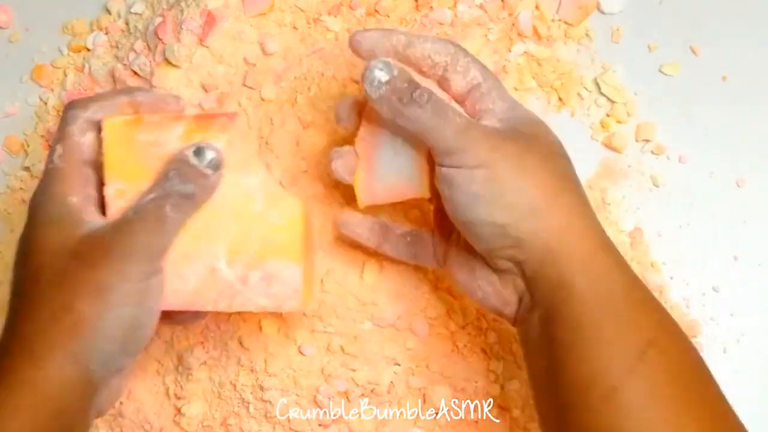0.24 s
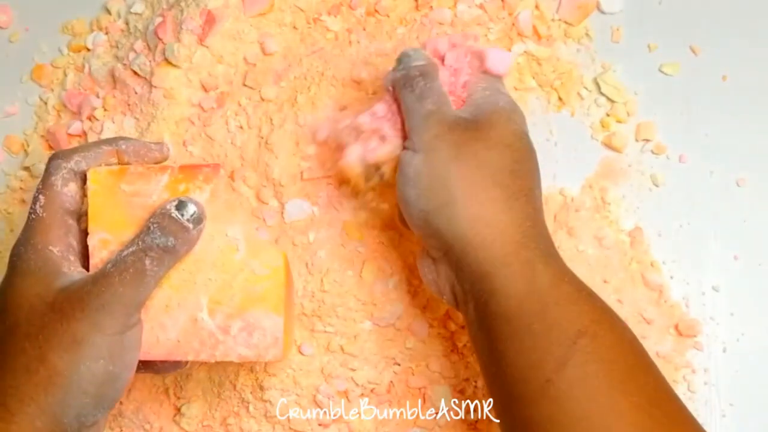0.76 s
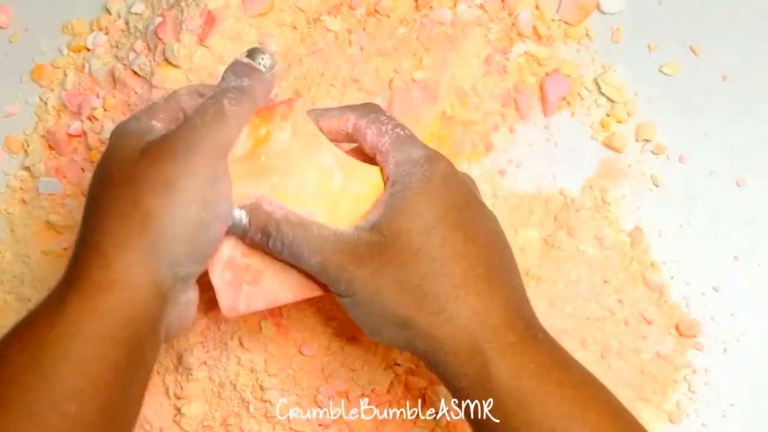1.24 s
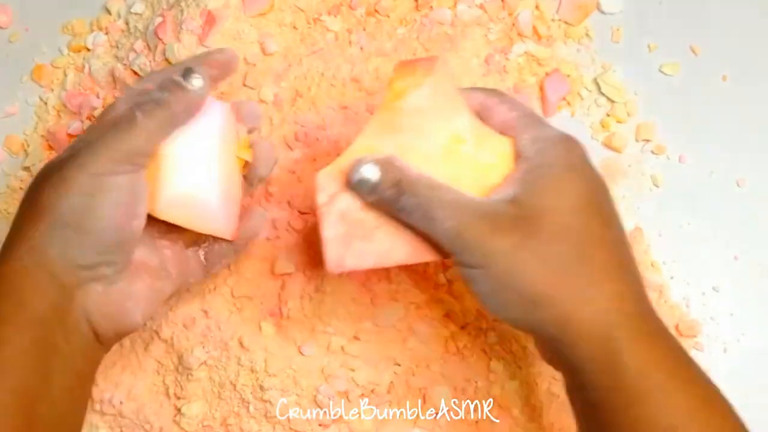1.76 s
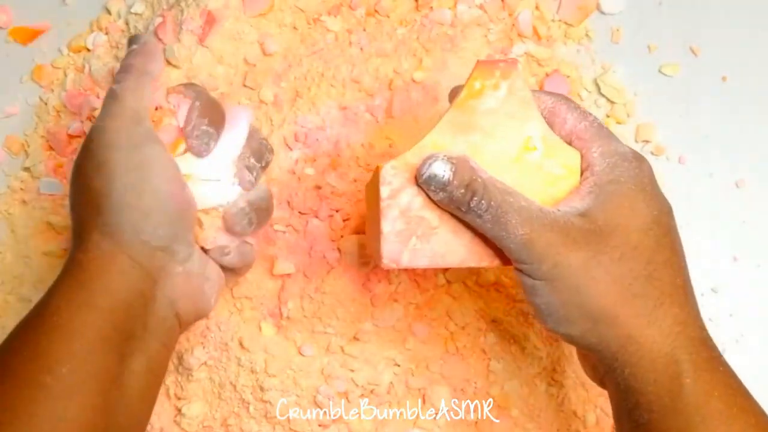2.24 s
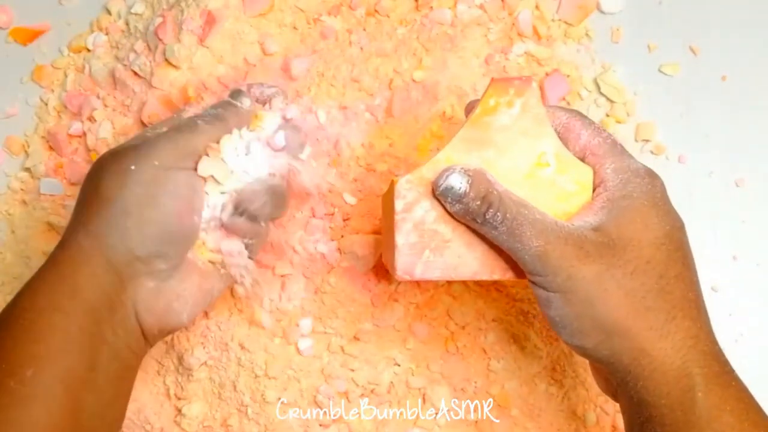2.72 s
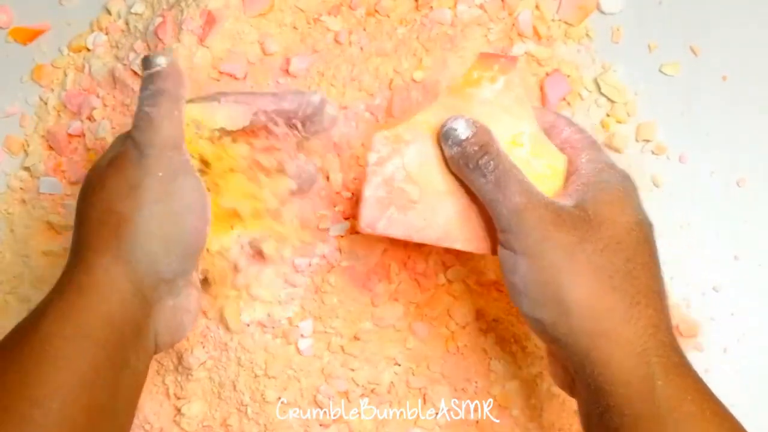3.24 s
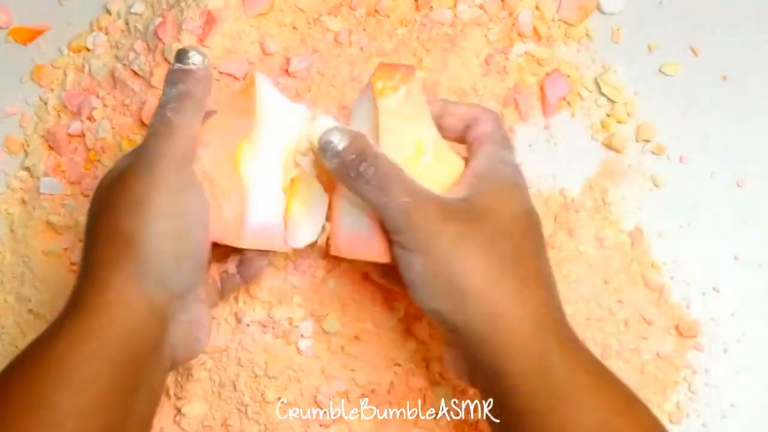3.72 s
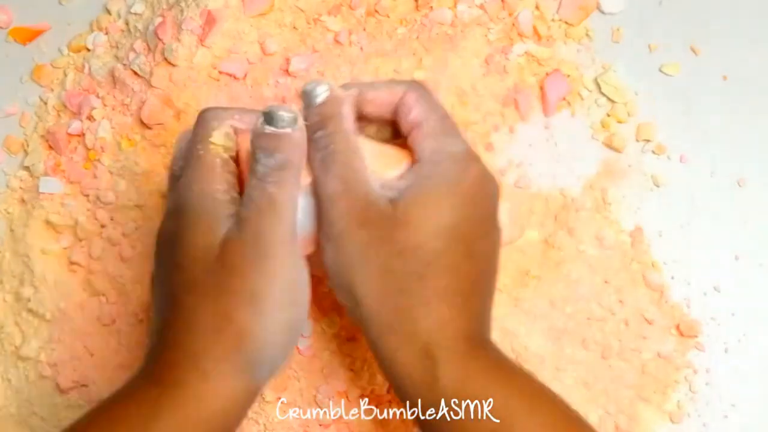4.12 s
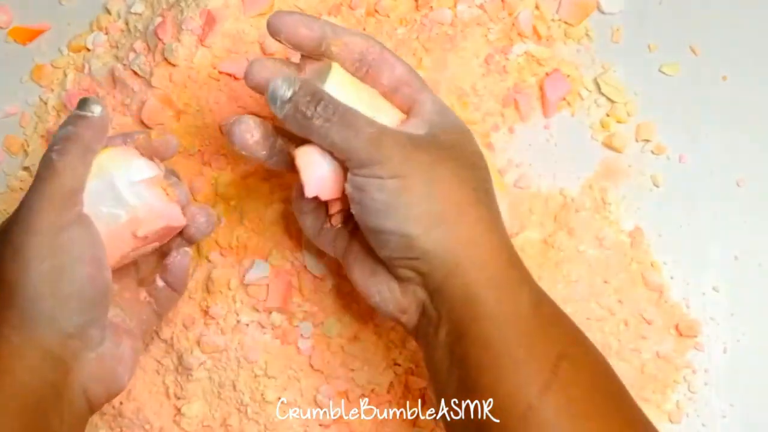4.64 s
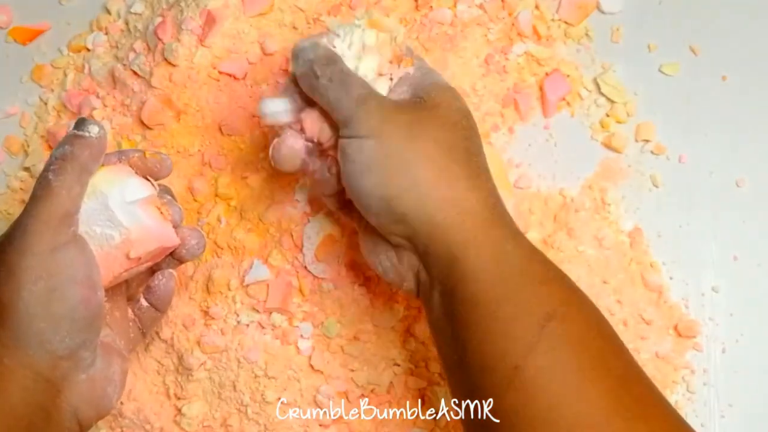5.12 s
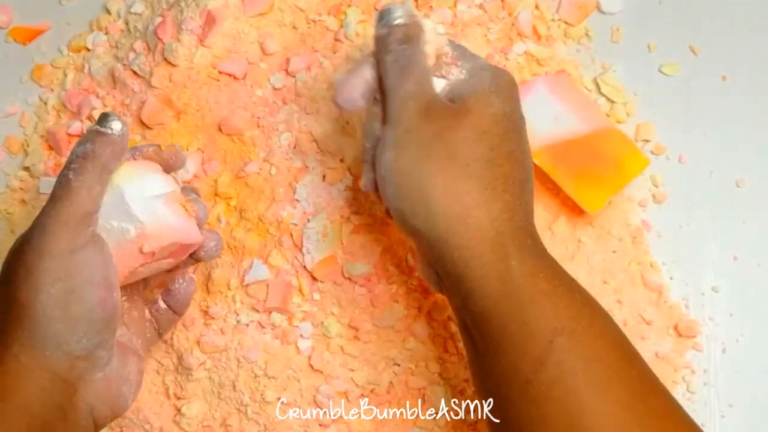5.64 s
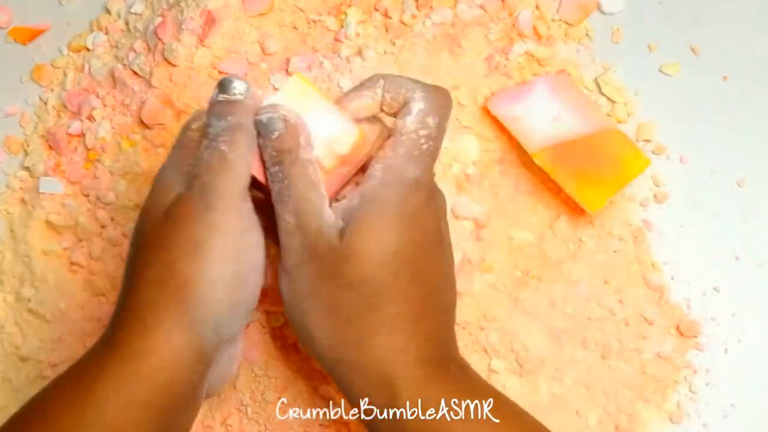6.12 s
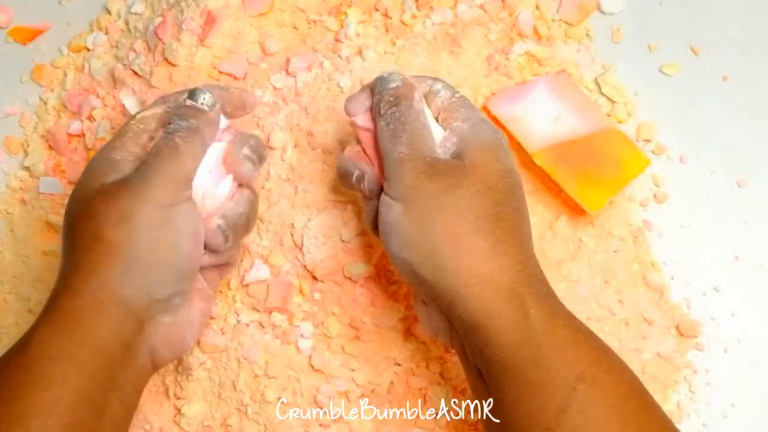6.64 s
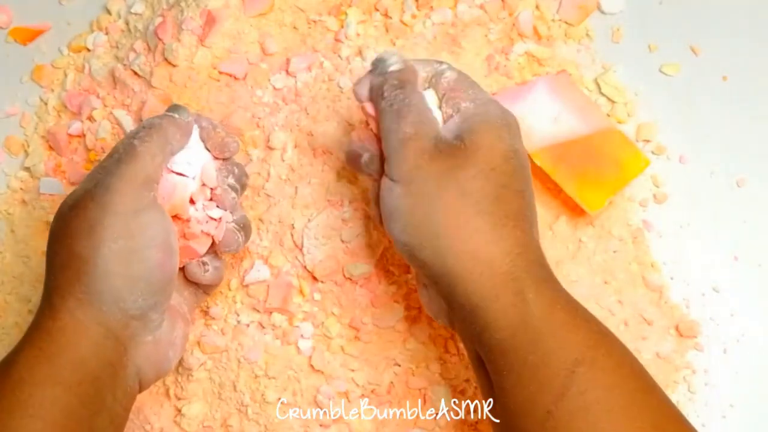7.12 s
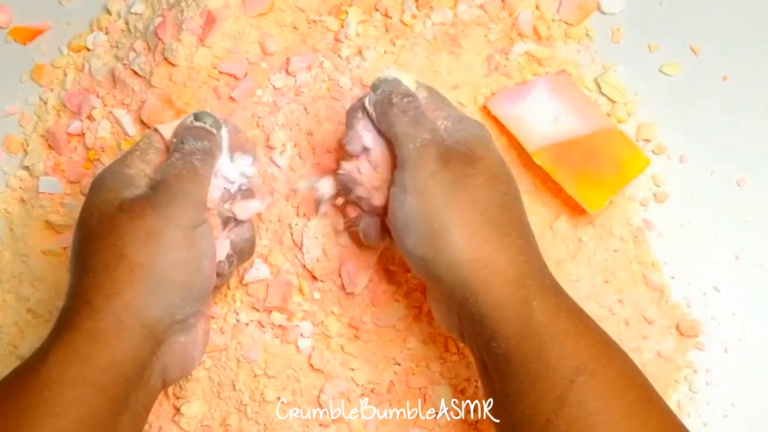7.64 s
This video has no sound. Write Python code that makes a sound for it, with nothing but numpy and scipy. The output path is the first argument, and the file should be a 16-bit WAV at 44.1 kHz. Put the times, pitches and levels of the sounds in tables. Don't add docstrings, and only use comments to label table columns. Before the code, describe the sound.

Dry chalk blocks snap sharply in the hands and crumble crunchily in closing fists, powder rubbing, lumps thudding on a table, faint fan hum behind.

```python
import sys
import numpy as np
from scipy import signal
from scipy.fft import rfft, irfft
from scipy.io import wavfile
from scipy.ndimage import uniform_filter1d

SR = 44100
rng = np.random.default_rng(int(sys.argv[2]) if len(sys.argv) > 2 else 0)


def digitize_waveform(pressure):
    field = np.atleast_2d(pressure).T
    bounded = np.clip(field, -1, 1)
    quanta = np.round(bounded * 32767).astype(np.int16)
    wavfile.write(sys.argv[1], SR, quanta)


def gain_from_decibels(decibels):
    exponent = np.asarray(decibels, float) / 20
    return 10 ** exponent


N = 347067

# (time [s], crack peak [dB], table knock [dB], block ring [dB], splinter [dB])
SNAPS = [(0.222, -22, -22.5, -35, -37), (0.231, -17.5, -10.5, -49, -36), (0.603, 0.5, -15, -11.5, -12),
         (0.635, -27, -39, -18.5, -32), (0.9843, -21, -28.5, -27.5, -35), (1.7435, 5.5, 3.5, 1, -13),
         (1.753, -31, -22, -20, -25.5), (1.785, -36, -21, -31, -41.5), (2.1063, -14, -7.5, -37, -13.5),
         (2.1237, -12.5, -17.5, -25, -14.5), (2.1435, -11.5, -13, -7.5, -13.5),
         (2.4924, -30, -29, -36.5, -31), (2.612, -12.5, -28, -24, -39), (3.0962, -38, -42, -29, -35),
         (3.7658, 7, 4, -3, -20.5), (3.7787, -18, -31, -24, -32.5), (3.8074, -39, -28.5, -38, -40),
         (4.4628, -20, -3, -11, -25), (4.469, -20, -31.5, -26, -24), (5.064, 1, -18, -36, -17),
         (5.0794, -11.5, -40, -14.5, -15), (7.306, 3, -6, -8.5, -5.5), (7.7461, -15, -29.5, -23, -19),
         (7.8654, -24.5, -28.5, -20, -26)]
# (start [s], length [s], force [dB], typical crumb pitch [Hz])
SQUEEZES = [(0.639, 0.31, 3, 4500), (0.951, 0.18, 3.5, 4300), (2.251, 0.13, -1, 4000),
            (2.468, 0.34, -10, 2800), (2.746, 0.21, -24, 1980), (3.03, 0.147, -11, 5500),
            (3.407, 0.094, -3.5, 4000), (4.372, 0.23, -2, 4956), (4.905, 0.13, -6, 4500),
            (5.087, 0.21, -1, 5180), (5.33, 0.33, 4, 3980), (5.72, 0.3, -3.5, 4970),
            (6.857, 0.23, -4.5, 4160), (7.597, 0.27, -1, 4500)]
CRUMB_DULL_DB = -14.5


def evened(x):
    return x / np.sqrt(np.mean(x ** 2) + 1e-20)


def spectrum_at(points, hz):
    f, value = np.transpose(points)
    return np.interp(np.log(hz + 1), np.log(f + 1), value)


def add(mix, s, sound):
    part = mix[round(s * SR):][:len(sound)]
    part += sound[:len(part)]


def band(x, lo_hz, hi_hz):
    sos = signal.butter(2, [lo_hz, min(hi_hz, SR / 2.2)], "bandpass", fs=SR, output="sos")
    return signal.sosfilt(sos, x)


def held(t):
    hold_s, drop_db, glide_s = 0.062, 10.0, 0.0071
    return gain_from_decibels(-drop_db / (1 + np.exp(-(t - hold_s) / glide_s)))


def coloured(points, patchy_db, size):
    hop = size // 4
    hz, frames = np.fft.rfftfreq(size, 1 / SR), N // hop + 5
    a, b, patches = rng.standard_normal((frames, len(hz), 3)).T
    patches = uniform_filter1d(patches, size // 40, 0)
    patches = evened(uniform_filter1d(patches, 3000 // hop, 1))
    z = (a + 1j * b) * gain_from_decibels(spectrum_at(points, hz)[:, None] + patchy_db * patches)
    return evened(signal.istft(z, nperseg=size, noverlap=size - hop)[1][:N])


def air():
    # (frequency [Hz], density [dB per Hz])
    air_spectrum = [(12, -53.5), (20, -12), (69, 5), (99, 4), (134, -3.5), (181, -9.5), (245, -7.5),
                    (293, -13), (499, -13), (807, -24), (2340, -33), (6770, -51.5), (7680, -44),
                    (8500, -48), (11000, -83), (18700, -120)]
    # (frequency [Hz], width [Hz], level [dB rms])
    fan_lines = [(86.6, 52, -58.5), (125.2, 13.2, -52.5), (241.5, 3.4, -52), (343.5, 4.6, -63.5)]
    out = gain_from_decibels(-46) * coloured(air_spectrum, 0.49, size=2048)
    for hz, width, db in fan_lines:
        r = np.exp(-np.pi * width / SR)
        drift = signal.lfilter([1 - r], [1, -r], rng.standard_normal((N, 2)) @ [1, 1j])
        waver = 1 + 0.85 * drift / abs(drift).mean()
        line = waver * np.exp(2j * np.pi * hz * np.arange(N) / SR)
        out += gain_from_decibels(db) * evened(line.real)
    return out


def room():
    # (frequency [Hz], t60 [s])
    room_decay = [(200, 0.27), (700, 0.2), (1800, 0.21), (4000, 0.41), (7000, 0.37)]
    # (frequency [Hz], level [dB])
    room_colour = [(200, 26), (800, 7.5), (2500, 9), (4500, 4), (6500, 12), (8000, 1.5)]
    # (frequency [Hz], width [Hz], level [dB])
    narrow_bands = [(1150, 175, 1.5), (1940, 850, 6.5), (2750, 220, -9), (3450, 380, 4.5), (4800, 260, 4),
                    (5500, 580, 1), (6300, 900, 4), (7260, 550, 11)]
    taps = np.zeros(SR // 2)
    at = np.arange(100, len(taps) - 20, 6)
    taps[at + rng.integers(0, 6, len(at))] = rng.choice([-1., 1.], len(at))
    hz, t, z = signal.stft(taps, SR, nperseg=256)
    colour_db = spectrum_at(room_colour, hz)
    for f, width, db in narrow_bands:
        colour_db = colour_db + db / (1 + (2 * (hz - f) / width) ** 2)
    t60 = np.maximum(spectrum_at(room_decay, hz), .02)
    z = z * gain_from_decibels(colour_db[:, None] - 60 * t / t60[:, None]) * held(t)
    tail = signal.istft(z, SR, nperseg=256)[1]
    return tail / np.linalg.norm(tail)


def grit(per_s, spread_db, lo_hz, hi_hz, smooth):
    luck = rng.random((N, 2))
    size = gain_from_decibels(-spread_db * np.log(luck[:, 1] + 0.0056))
    ticks = (luck[:, 0] < per_s / SR) * size * rng.standard_normal(N)
    return evened(band(evened(ticks) + smooth * rng.standard_normal(N), lo_hz, hi_hz))


def grip():
    rise_s, sag_db = 0.015, -6
    out = np.zeros(N)
    for s, length, force_db, _ in SQUEEZES:
        t = np.arange(0, length + 0.07, 1 / SR)
        press = np.minimum(t / rise_s, 1) * gain_from_decibels(force_db + sag_db * t / length)
        let_go = np.clip((length + 0.015 - t) / 0.04, 0, 1)
        add(out, s, press * let_go)
    return out


def hands():
    # (time [s], rub level [dB], coarseness of what they stir [dB])
    stirring = [(0.0, -66, -0.5), (0.57, -60.5, -5.5), (0.76, -50.5, -6.5), (1.27, -54.5, -1),
                (1.51, -66.5, 2), (2.15, -59, -6.5), (2.3, -57.5, -1), (2.52, -52, -2.5),
                (3.11, -58.5, 3.5), (3.86, -62.5, -3), (4.32, -50, -12.5), (4.71, -63, 2.5),
                (5.15, -55, -4.5), (6.66, -58, -4), (6.82, -55.5, -9), (7.17, -60.5, -1.5),
                (7.61, -55.5, -3), (7.87, -54.5, -8)]
    # (frequency [Hz], density [dB per Hz])
    powder_spectrum = [(880, -16.5), (1500, -14.5), (1880, -11), (2820, -19), (4170, -6.5), (4650, -11.5),
                       (6740, -6), (7570, -7.5), (8500, -53), (11000, -79), (18700, -120)]
    s, *columns = np.transpose(stirring)
    rub_db, coarse_db = (np.interp(np.arange(N) / SR, s, c) for c in columns)
    rub = coloured(powder_spectrum, 4.0, size=256) + .4 * grit(900, 2.5, 3000, 8000, .1)
    crunch = grit(900, 2.5, 900, 3600, 1.0)
    roll = grit(400, 3.0, 280, 900, 1.2)
    crunch_gain = gain_from_decibels(rub_db + coarse_db) + gain_from_decibels(-53.5) * grip()
    roll_gain = gain_from_decibels(rub_db + 0.5 + 1.15 * coarse_db)
    return gain_from_decibels(rub_db) * evened(rub) + crunch_gain * crunch + roll_gain * roll


def slides():
    # (time [s], length [s], level [dB], lowest frequency [Hz])
    slide_events = [(0.002, 0.075, -53, 900), (0.299, 0.068, -48, 2465), (0.218, 0.093, -32.5, 490),
                    (0.436, 0.088, -51, 3100), (0.57, 0.085, -36.5, 940), (1.192, 0.46, -56, 3070),
                    (1.203, 0.0394, -43, 3400), (1.245, 0.12, -39.5, 3270), (1.347, 0.12, -44.5, 3680),
                    (1.441, 0.07, -45.5, 3350), (4.077, 0.022, -35.5, 590), (4.43, 0.04, -40, 1484),
                    (3.335, 0.44, -53, 4170), (2.25, 0.048, -37.5, 1013), (2.48, 0.027, -43, 600),
                    (2.534, 0.086, -40.5, 700), (2.761, 0.086, -44.5, 785), (2.884, 0.13, -47.5, 810),
                    (3.026, 0.095, -41.5, 700), (3.241, 0.062, -47, 500), (3.626, 0.048, -50.5, 4000),
                    (4.096, 0.081, -41, 4050), (4.232, 0.1, -41, 5340), (4.619, 0.1, -49, 2760),
                    (4.696, 0.12, -50, 3760), (6.261, 0.16, -47, 3140), (6.614, 0.122, -50.5, 4950),
                    (6.709, 0.054, -47, 5010), (6.801, 0.079, -39, 700), (4.171, .055, -44, 5250),
                    (4.25, 0.064, -45, 2690), (5.3, 0.031, -46, 2250), (6.396, 0.096, -50, 4000),
                    (6.155, 0.094, -52, 3000), (6.598, .07, -60, 3500)]
    rise_s, fade_share, sag_db = 0.011, 0.49, 8.2
    out = np.zeros(N)
    for s, length, db, lo_hz in slide_events:
        t = np.arange(round(length * SR)) / SR
        luck = rng.standard_normal((len(t), 2))
        grains = luck[:, 0] * gain_from_decibels(6.0 * luck[:, 1])
        centres = np.r_[1.12 * lo_hz, 1.3 * lo_hz, rng.uniform(lo_hz, 7620, size=4)]
        streaks = sum(band(grains, hz / 1.025, hz * 1.025) for hz in centres)
        hiss = evened(band(grains, lo_hz, 7700)) + lo_hz / 6500 * evened(streaks)
        edges = np.minimum(t / rise_s, (1 - t / length) / fade_share)
        add(out, s, gain_from_decibels(db - sag_db * t / length) * evened(hiss) * np.clip(edges, 0, 1))
    return out


def fracture(t60, luck, slips_per_s, lead_s):
    t = np.arange(len(luck)) / SR - lead_s
    slips = luck[:, 0] * ((luck[:, 1] < slips_per_s / SR) + .25)
    slips[np.argmax(t >= 0)] = 3
    return slips * np.where(t < 0, .2, gain_from_decibels(-60 * t / max(t60, .002)))


def cracks(rows):
    ring_from_hz, ring_q, ring_db = 2300, 15, -5.5
    out = np.zeros(N)
    for s, db, hz, dull_db in rows:
        luck = np.c_[rng.standard_normal(600), rng.random(600)]
        slips = fracture(.013, luck, 2800, 0)
        tick = band(slips, hz / 1.74, hz * 1.414) + 0.25 * band(slips, 2200, 5500)
        if hz > ring_from_hz:
            ringing = signal.lfilter(*signal.iirpeak(hz, ring_q, SR), tick)
            tick = tick + gain_from_decibels(ring_db) * np.sqrt(ring_q) * ringing / 2
        dull = band(slips, 380, 1700)
        add(out, s, gain_from_decibels(db) * (tick / abs(tick).max() + gain_from_decibels(dull_db) * dull / abs(dull).max()))
    return out


def stray_ticks():
    # (time [s], peak [dB], pitch [Hz])
    tick_events = [(0.6038, -7, 1700), (.6062, -5.5, 2200), (.62, -26, 1800), (4.463, -5.5, 1950),
                   (4.465, -11.5, 1900), (3.9685, -28, 2000), (6.865, -26, 3900), (.012, -35, 960),
                   (2.4557, -35, 6030), (2.5405, -35, 1500), (2.58, -28, 3500), (2.584, -27, 5500),
                   (2.6915, -27, 5500), (2.724, -34, 2000), (2.905, -40, 3500), (2.925, -40, 4000),
                   (3.0382, -31, 4500), (3.072, -34, 3500), (3.107, -39, 2500), (3.205, -41, 3000),
                   (4.2401, -24, 5900), (4.241, -27, 7340), (4.9448, -18.5, 4500), (4.996, -15, 4000),
                   (5.105, -23, 3000), (5.124, -25, 5000), (5.174, -34, 1480), (5.487, -27, 4500),
                   (5.498, -35, 2580), (5.607, -38, 3500), (5.64, -41, 2000), (5.746, -38, 6230),
                   (5.824, -43, 1630), (5.9485, -38, 7300), (6.327, -28, 6000), (6.4709, -36, 5040),
                   (6.533, -39, 2500), (6.6729, -37, 6000), (6.729, -37, 2000), (6.854, -28, 4200),
                   (6.899, -31, 1500), (6.9335, -17.5, 1520), (6.949, -36, 6000), (6.966, -36, 6200)]
    return cracks([(*r, -20.5) for r in tick_events])


def crumbs_and_chips():
    # (time [s], peak [dB], pitch [Hz])
    crumb_and_chip_events = [(0.6385, -12.5, 2140), (0.7056, -12.5, 5020), (0.7276, -13, 3300), (0.731, -12.5, 5700),
                             (0.7636, -20.5, 4620), (1.089, -22, 5160), (2.3547, -16.5, 5500), (2.367, -27, 7350),
                             (3.9692, -22.5, 4400), (4.365, -18, 7250), (4.9277, -15, 4800), (4.95, -11, 4730),
                             (4.998, -13, 5300), (5.077, -4, 4320), (5.343, -11, 5460), (5.369, -13.5, 4500),
                             (5.379, -15, 4140), (5.409, -16.5, 4150), (5.4136, -20, 4810), (5.552, -17.5, 5680),
                             (5.7844, -19, 4370), (6.8548, -19, 3400), (6.8632, -4.5, 3480), (6.8976, -19, 4324),
                             (6.933, -13.5, 4540), (6.989, -22.5, 6830), (7.653, -24.5, 3220), (7.6612, -20.5, 6250),
                             (0.6523, -22, 4220), (0.686, -25, 6550), (0.808, -22, 4900), (1.0048, -25, 4570),
                   (1.0474, -26, 4400), (2.338, -23, 4800), (2.474, -33, 4500), (2.564, -29, 1890),
                   (2.581, -26, 1580), (2.6575, -24.5, 4700), (2.689, -24, 3520), (2.7807, -24.5, 1980),
                   (3.1214, -26, 4840), (3.1503, -26, 6300), (3.7962, -18.5, 1900), (4.886, -26, 6903),
                   (4.918, -21, 7350), (4.987, -16, 4530), (5.2187, -29, 3440), (5.443, -21, 6040),
                   (5.49, -28, 1900), (5.5907, -26, 2760), (5.725, -26, 6400), (6.072, -28.5, 5152),
                   (6.881, -23, 4300), (6.9129, -25, 3700), (6.9196, -18, 6320), (7.6176, -21, 6570),
                   (7.7646, -25, 2180)]
    return cracks([(*r, CRUMB_DULL_DB) for r in crumb_and_chip_events])


def crushed_lumps():
    # (time [s], peak [dB], pitch [Hz], dull part against the tick [dB])
    lump_events = [(0.793, -27.5, 1430, 4), (1.9257, -26.5, 1780, -25), (2.1735, -16.5, 4200, -2.5),
                   (2.2033, -24.5, 1662, 4), (2.265, -14.5, 3300, -9), (2.3085, -26, 1780, -15),
                   (2.3198, -19, 3470, -7.5), (2.394, -28.5, 4300, -9), (3.045, -27, 5430, -20),
                   (3.4663, -27.5, 4460, 1), (3.9804, -22.5, 3730, -9.5), (4.398, -24.5, 2850, -11),
                   (4.947, -23, 1630, 4.5), (4.9835, -11, 4260, -7), (5.016, -16.5, 4180, -10),
                   (5.1404, -22, 6000, -15), (5.3986, -18, 4260, -19), (5.6825, -28.5, 3720, -2.5),
                   (6.1147, -35.5, 1520, -2.5), (6.817, -17.5, 4060, -8.5), (6.9296, -12.5, 2360, -13.5),
                   (7.3031, -27.5, 1790, 11.5), (7.308, 0, 2430, -7.5), (7.3172, -15, 2210, -17),
                   (7.323, -29, 6800, -20), (7.4105, -26, 4443, -9), (7.604, -29, 4240, -17),
                   (7.6675, -22.5, 3100, -9), (7.711, -15.5, 6600, -9), (7.726, -14.5, 3200, -4),
                   (7.827, -12, 6400, -6), (2.461, -38, 1510, -4), (2.53, -37, 1200, 0),
                   (2.676, -32, 4035, -4), (2.761, -41, 1000, 1), (2.811, -36, 1179, 0),
                   (2.86, -45, 1520, 0), (2.966, -29.5, 1150, -22), (3.002, -54, 1000, -7.5),
                   (3.027, -35.5, 2200, -16), (3.175, -30, 4000, -8), (3.24, -42, 1000, 7),
                   (6.806, -41.5, 1100, 1), (6.829, -36, 1000, 1), (6.8683, -20.5, 3470, -4.5),
                   (7.022, -32, 2140, -13), (4.239, -26.5, 3220, -34), (4.2438, -28, 3240, -33),
                   (4.362, -19.5, 2960, -14), (4.432, -23, 4800, -12), (4.4626, -9.5, 4200, -19.5)]
    return cracks(lump_events)


def squeezes():
    crumbs_per_s, small_db, size_spread_db, pitch_spread = 24, -36, 2.0, .35
    rows = []
    for s, length, force_db, typical_hz in SQUEEZES:
        count = round(length * crumbs_per_s)
        for i in range(count):
            when = s + length * (i + rng.random()) / count
            db = small_db + force_db + size_spread_db * rng.standard_normal()
            hz = np.clip(typical_hz * np.exp(pitch_spread * rng.standard_normal()), 1500, 7300)
            rows.append((when, db, hz, CRUMB_DULL_DB))
    return cracks(rows)


def splinters():
    delay_s, typical_hz, pitch_spread = 0.003, 1830, .1
    rows = []
    for s, *_, splinter_db in SNAPS:
        hz = typical_hz * np.exp(pitch_spread * rng.standard_normal())
        rows.append((s + delay_s, splinter_db, hz, CRUMB_DULL_DB))
    return cracks(rows)


def bumps():
    # (time [s], peak [dB], contact [s])
    bump_events = [(1.7855, -18.5, 0.0026), (3.779, -16.5, 0.0022), (3.8068, -18, 0.0027),
                   (4.1404, -18.5, .003), (5.5162, -4.5, 0.0018), (5.519, -8, 0.0013),
                   (5.5238, -8.5, 0.0023), (5.5397, -4.5, 0.0041), (5.531, -6.5, .006),
                   (5.562, -22, 0.0043), (5.5707, -19, 0.0043), (5.5782, -13, 0.0041), (4.1077, -15, .003),
                   (4.1165, -19, 0.0031), (1.7566, -16, 0.0023), (0.27, -21, 0.0014), (0.25, -18, 0.0038),
                   (0.26, -16, 0.0028), (0.26, -19.5, 0.0036)]
    out = np.zeros(N)
    for s, db, contact_s in bump_events:
        add(out, s, gain_from_decibels(db) * np.hanning(round(contact_s * SR) + 3))
    return band(out, 89.0, 2400)


def ring(modes, contact_s):
    t = np.arange(SR // 5) / SR
    out = np.zeros(len(t))
    for hz, db, t60 in modes:
        place, detune = rng.standard_normal(2)
        level = gain_from_decibels(db + 1.5 * place - 60 * t / max(t60, .005))
        out += level * np.sin(2 * np.pi * hz * (1 + detune / 60) * t)
    out = np.convolve(out * held(t), np.hanning(round(contact_s * SR) + 3))[:len(t)]
    return out / abs(out).max()


def blow(block, table, s, crack_db, boom_db, knock_db, ring_db, knock_modes):
    # (frequency [Hz], level [dB], t60 [s])
    block_modes = [(670, 22.5, 0.0252), (943, 20.5, 0.0054), (1100, 34, 0.014), (1118, 5, 0.41),
                   (1410, -52, 0.0059)]
    # (frequency [Hz], level [dB], t60 [s])
    boom_modes = [(87.2, -19.5, 0.08933), (95, -8, 0.91), (126.1, 21.5, 0.56), (133.6, 10.5, 0.52),
                  (156, 1.5, 0.38), (196, -1.5, 0.39), (242, -15, 0.37), (150.75, 7.5, 0.051)]
    t60 = np.clip(0.041 * gain_from_decibels(knock_db - crack_db), .008, .016)
    luck = np.c_[rng.standard_normal(4000), rng.random(4000)]
    crack = band(fracture(t60, luck, 9000, 0.000739), 1320, 7270)
    contact_s = 0.00024 + 0.00055 * (boom_db > knock_db - 6)
    add(block, s, gain_from_decibels(crack_db) * crack / abs(crack).max())
    add(block, s, gain_from_decibels(ring_db) * ring(block_modes, 0.00068))
    add(table, s, gain_from_decibels(knock_db) * ring(knock_modes, contact_s))
    add(table, s, gain_from_decibels(boom_db) * ring(boom_modes, 0.003))


def landings(block, table):
    # (time [s], crack peak [dB], table knock [dB], table boom [dB])
    drop_events = [
        (1.008, -26, -23.5, -26),
        (2.5895, -44, -23.5, -31),
        (4.0911, -28, -15.5, -7.5),
        (4.144, -44, -39.5, -22.5),
        (5.5157, -10.5, -11.5, -39),
        (5.523, -24, -19, -8),
        (5.5396, -27, -23, -26),
        (6.0397, -53.5, -32, -38),
    ]
    # (frequency [Hz], level [dB], t60 [s])
    thud_modes = [(184, 1, 0.12), (243.6, -9, 0.1), (342, 4, 0.11), (377.4, 5.5, 0.17), (425, -3, .1),
                  (561, -2.5, 0.12), (700, 0, 0.041), (917, -6, 0.052), (1240, -8, 0.049),
                  (1620, 0.5, 0.057)]
    for s, crack_db, knock_db, boom_db in drop_events:
        blow(block, table, s, crack_db, boom_db, knock_db, knock_db - 13, thud_modes)


def snaps(block, table):
    # (frequency [Hz], level [dB], t60 [s])
    thock_modes = [(524, 21, 0.014), (700, -2, 0.02), (237.5, -14.5, 0.25), (263.4, -7.5, 0.33),
                   (367, -11, 0.12), (382.3, -4.5, 0.24), (422.3, 4, 0.16), (521, -11, 0.39),
                   (576, -5, 0.1), (617, 2.5, 0.047)]
    for s, crack_db, knock_db, ring_db, _ in SNAPS:
        blow(block, table, s, crack_db, knock_db - 22, knock_db, ring_db, thock_modes)


def scene():
    bed = air() + hands() + slides()
    crumbs = stray_ticks() + crumbs_and_chips() + crushed_lumps() + squeezes() + splinters()
    block, table = np.zeros((2, N))
    landings(block, table)
    snaps(block, table)
    table = band(table, 110, 2200) + bumps()
    to_room = gain_from_decibels(-9.5) * block + gain_from_decibels(-10.5) * band(table, 190, 3000) + gain_from_decibels(-9.0) * crumbs
    wet = signal.fftconvolve(to_room, room())[:N]
    mono = block + table + crumbs + wet + bed
    return np.array([mono, mono])


def with_gaps(x):
    # (time [s], length [s], lowest frequency [Hz], highest frequency [Hz])
    hole_events = [(1.7345, .0065, 1700, 9000), (3.7545, .007, 1600, 9000), (5.0555, .004, 1700, 3300),
                   (7.284, .017, 1700, 9000), (7.293, .008, 900, 1700), (4.075, .092, 3850, 4350),
                   (4.09, .07, 3550, 3700), (4.105, .075, 2550, 2950), (4.125, .05, 1450, 1750),
                   (4.152, .016, 1450, 3500), (4.083, .02, 5850, 6050), (5.56, .025, 850, 1150)]
    out, hz = x.copy(), np.fft.rfftfreq(8192, 1 / SR)
    for s, length, lo_hz, hi_hz in hole_events:
        at = round(s * SR)
        gate = signal.windows.tukey(round(length * SR), .3) ** .5
        piece = rfft(out[:, at:at + len(gate)] * gate, 8192) * ((hz > lo_hz) & (hz < hi_hz))
        out[:, at:at + len(gate)] -= irfft(piece)[:, :len(gate)] * gate
    return out


def side_error(mono):
    # (frequency [Hz], level [dB])
    error_level = [(200, -61.5), (600, -42.5), (1200, -27), (3000, -26.5), (7000, -26)]
    hz, t, z = signal.stft(mono, SR, nperseg=1024)
    patches = rng.random((len(hz) // 12 + 1, len(t) // 4 + 1)) < .3
    on = np.repeat(np.repeat(patches, 12, 0), 4, 1)[:len(hz), :len(t)]
    scramble = np.exp(2j * np.pi * rng.random(z.shape))
    z = z * on * scramble * gain_from_decibels(spectrum_at(error_level, hz))[:, None]
    return signal.istft(z, SR, nperseg=1024)[1][:N]


def band_limit(x):
    return signal.sosfilt(signal.butter(12, 16320, fs=SR, output="sos"), x)


def record(dry):
    lowpass = signal.firwin(201, 7982, window=("kaiser", 9), fs=SR)
    dull = signal.oaconvolve(with_gaps(dry), lowpass[None], "same")
    stereo = dull + np.outer([1, -1], side_error(dull[0]))
    overloaded = np.clip(stereo, -1, 1)
    return band_limit(overloaded)


dry = scene()
out = record(dry)
digitize_waveform(out)
```